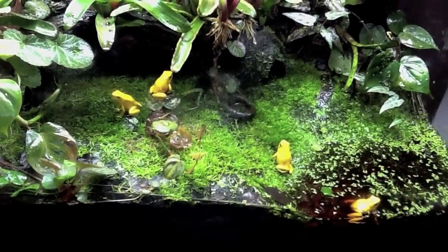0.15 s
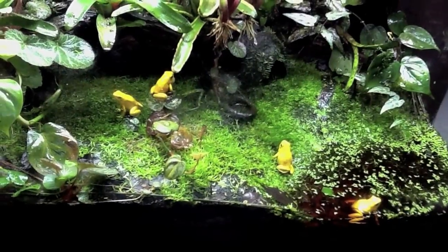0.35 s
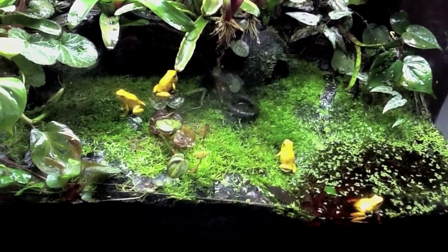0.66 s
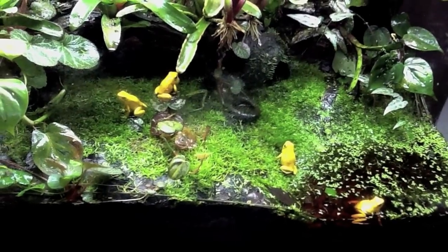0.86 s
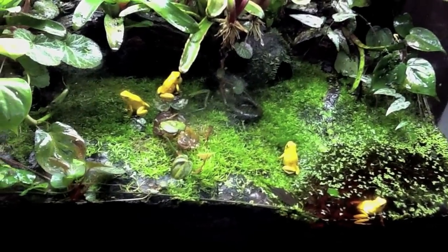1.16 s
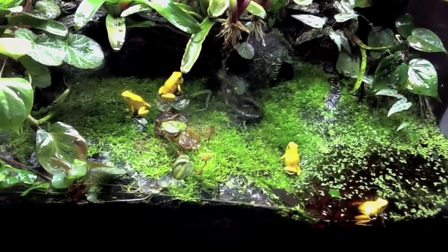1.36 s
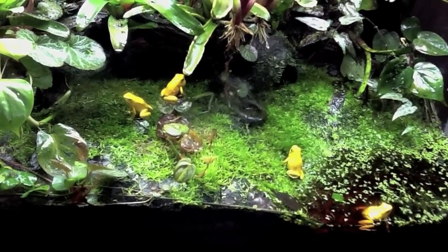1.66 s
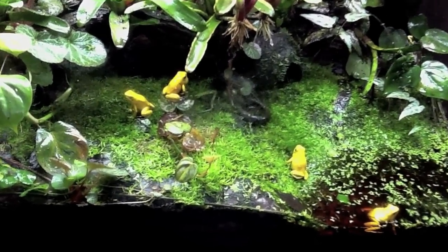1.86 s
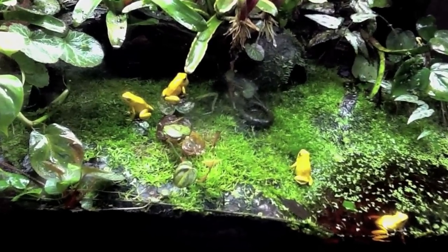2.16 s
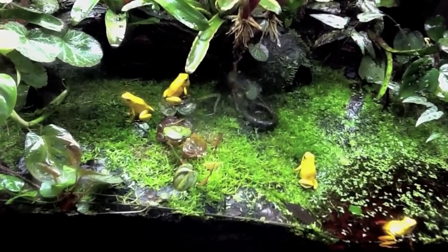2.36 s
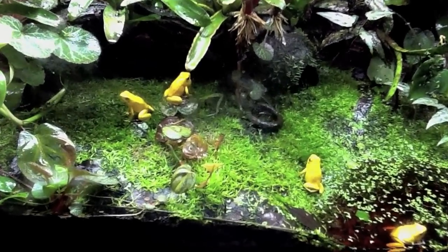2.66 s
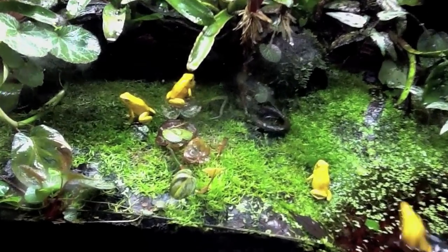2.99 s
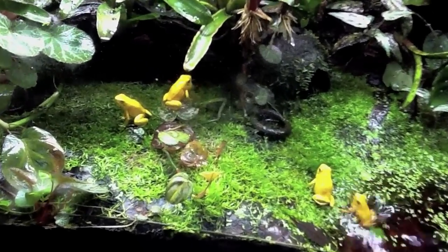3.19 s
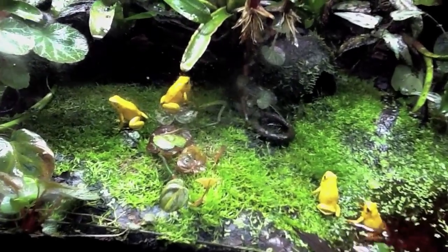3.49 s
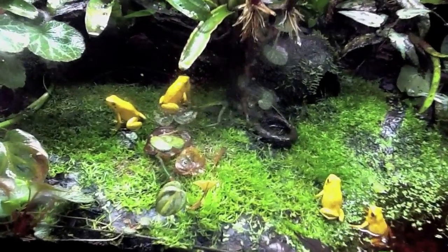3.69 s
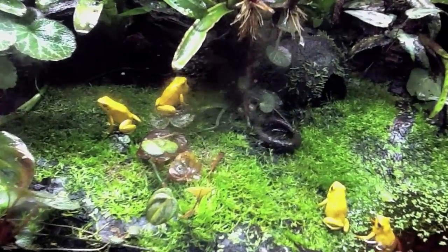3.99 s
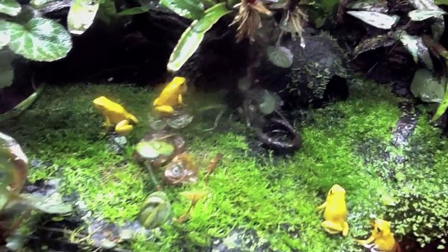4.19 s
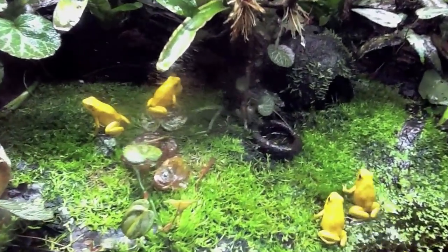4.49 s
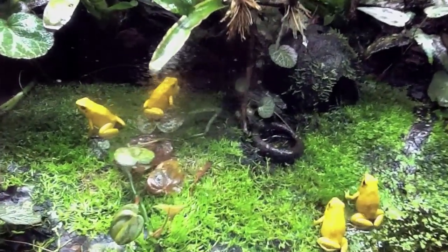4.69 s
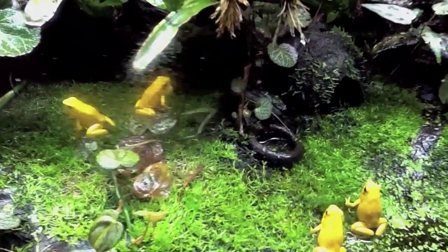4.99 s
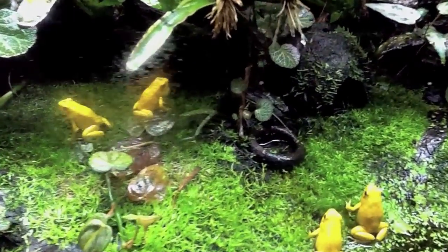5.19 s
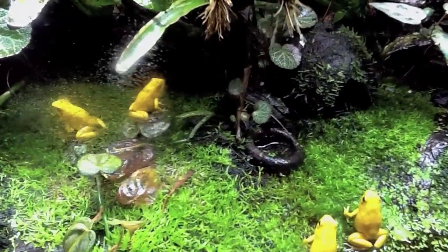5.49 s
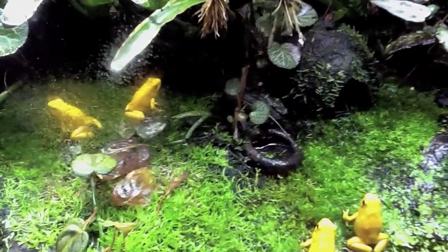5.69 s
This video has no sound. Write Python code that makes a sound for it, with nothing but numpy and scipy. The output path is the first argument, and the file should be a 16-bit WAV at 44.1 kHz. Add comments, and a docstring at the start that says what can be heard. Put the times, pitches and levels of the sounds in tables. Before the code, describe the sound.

A small frog calls in a rapid, clicky, high-pitched trill over the faint low hum of a fan.

```python
"""Poison frog in a glass terrarium

The frog trills at about ten notes a second, with three weak squeaks where notes fail. Each note opens
with a click of the larynx; then a reedy tone, the harmonics of the vocal cords filtered by the vocal
sac, arches up, sags under pressure and falls away. The planted glass tank reflects the sound and
rings briefly. A ventilation fan hums underneath, with a few faint ticks and rustles."""
import sys
import numpy as np
from scipy import signal
from scipy.fft import rfft, irfft, next_fast_len
from scipy.io import wavfile
from scipy.ndimage import map_coordinates

SR = 44100
rng = np.random.default_rng(int(sys.argv[2]) if len(sys.argv) > 2 else 0)


def transcribe(u):
    """Save the signal u as a 16-bit wav file named by the first command-line argument.

    u: samples, shape (n,) or (channels, n), limited to [-1, 1]; the rate is SR.
    q: integer samples, one column per channel.
    """
    v = np.clip(np.atleast_2d(u).T, -1, 1)
    q = np.round(v * 32767).astype(np.int16)
    wavfile.write(sys.argv[1], SR, q)


N = 257984
TIME = np.arange(N) / SR

# effort, which builds over the trill and slackens at its end: t/s, level/dB, f/Hz
CALL_EFFORT = [(.24, -35, 1421), (.62, -32.5, 1396), (1.25, -31, 1408), (1.5, -29, 1436),
               (2.1, -28.5, 1474), (2.33, -28.5, 1440), (3.05, -28.5, 1440), (3.35, -28, 1480),
               (3.85, -27, 1462), (4.33, -28, 1472), (4.64, -29.5, 1427)]
# mid-note pitch sag: t/s, depth at full effort/fraction of the pitch
SAG_DEPTH = [(.24, 0.12), (.62, 0.076), (1.4, .063), (1.62, 0.13), (2.4, 0.11), (3.15, .15), (3.38, .088),
             (4.2, .075), (4.64, .045)]
# spectral tilt above the second harmonic: t/s, slope/(dB per octave)
OVERTONE_TILT = [(.24, -8), (.62, 1), (1.22, 2.5), (1.62, 1.5), (3.05, 1.5), (3.38, -0.3), (4.13, .1),
                 (4.45, 3), (4.64, 0)]
# note duration, longest in the middle of the trill: t/s, duration/s
NOTE_LENGTH = [(.24, .035), (.62, .0415), (1.8, 0.0409), (2.4, 0.043), (3.4, .043), (3.8, .0405),
               (4.4, .041), (4.64, .0365)]


def trill(full_effort_db=-28.5, click_db=-31, click_per_effort=-.2):
    """Pulsed airflow: each squeeze of the flanks drives one click and one tone, no two quite alike."""
    track, t = np.zeros(N), np.arange(SR // 16) / SR
    starts = note_onsets()
    for s, (tone_spread, click_spread, sag_spread) in zip(starts, rng.standard_normal((len(starts), 3))):
        db, pitch_hz = values_at(CALL_EFFORT, s)
        sag, = values_at(SAG_DEPTH, s)
        tilt_db, = values_at(OVERTONE_TILT, s)
        length, = values_at(NOTE_LENGTH, s)
        effort_db = db - full_effort_db
        tone = vocal_cords(t, effort_db, pitch_hz, sag * (1 + .12 * sag_spread), length, tilt_db)
        tone_gain = amp(db + .32 * tone_spread)
        # the click gives way as the squeeze hardens
        click_gain = amp(click_db + click_per_effort * effort_db + .8 * click_spread)
        note = tone_gain * tone + click_gain * larynx_click(t)
        add(track, s, terrarium(note, tank_db=-8.5, room_db=-4.5))
    return track


# runs of evenly spaced notes: first onset t/s, last onset t/s
NOTE_RUNS = [(0.238, 0.2383), (0.6212, 0.8122), (1.0040, 1.395), (1.5838, 1.7808), (2.0727, 2.5568),
             (2.6606, 2.863), (2.9560, 3.3450), (3.4450, 4.5290), (4.6392, 4.63)]


def note_onsets(period_s=.098):
    """Near-periodic repetition: the beat is steady within a run and slips a little between runs."""
    return np.concatenate([np.linspace(first, last, 1 + round(abs(last - first) / period_s))
                           for first, last in NOTE_RUNS])


# course of one note: fraction of its length, pitch ratio at full effort, air pressure/dB
NOTE_ARCH = [(0, .876, -15.5), (.1, .93, -13), (.25, .973, -7.3), (.45, .993, -3.4), (.66, 1.025, -.9),
             (.77, .993, -6.5), (.84, .969, -9), (.92, 0.908, -4), (1, .888, -9.5)]
# radiation response of the vocal sac: f/Hz, level/dB
SAC_RESPONSE = [(1130, -5.5), (1330, -8), (1490, -1.36), (2300, -3.5), (2620, 3), (2960, 1), (3250, -15),
                (3850, -8), (4250, -6.5), (4800, -21), (5850, -21), (7100, -25), (7900, -35), (8300, -25.5),
                (8650, -19), (9300, -35), (10000, -39)]


def vocal_cords(t, effort_db, pitch_hz, sag, length, tilt_db, sag_at=.476, sag_width_s=.00389,
                jitter=.0063, flutter=.079, dulling_db=12, bloom_above_db=-4):
    """Source and filter: harmonics sweep through the sac's resonances and dull as the air runs out."""
    progress = np.clip(t / length, 0, 1)
    ratio, pressure_db = values_at(NOTE_ARCH, progress)
    bend = ratio - 1 - sag * np.exp(-((t - sag_at * length) / sag_width_s) ** 2)
    # under a feeble squeeze the cords flutter and the note turns into a croak
    croak = np.interp(effort_db, [-8, -5], [1, 0])
    unsteady = (jitter + flutter * croak) * wobble(706, len(t))
    # a harder squeeze bends the pitch further
    hz = pitch_hz * (1 + amp(1.48 * effort_db) * bend + unsteady)
    phase = 2 * np.pi * np.cumsum(hz) / SR
    harmonic = np.arange(1, 8)[:, None]
    octaves = np.log2(harmonic / 2)
    slope_db = tilt_db * np.maximum(octaves, 0) - dulling_db * (progress - .5) * octaves
    # the top harmonics bloom with effort and high pressure
    bloom_db = (1.45 * effort_db + .42 * (pressure_db - bloom_above_db)) * (harmonic > 3)
    harmonic_db = along(SAC_RESPONSE, harmonic * hz) + slope_db + bloom_db
    tone = np.sum(amp(harmonic_db) * np.sin(harmonic * phase), axis=0)
    return tone * amp(pressure_db) * gate(t, length, rise=.0018, fall=.0033)


# modes struck as the larynx opens: f/Hz, level/dB, T60/s
LARYNX_MODES = [(1370, -2.5, 0.03), (1559, -4, 0.021), (1960, -12.5, 0.026), (2287, -.2, 0.016),
                (2945, -3, 0.0063), (4140, -13.5, 0.014)]


def larynx_click(t, rattle=.047, rattle_t60=.045, rise_s=.00082, cutoff_hz=1200):
    """Impulse excitation: a snap and brief rattle ring damped modes; the small body radiates no bass."""
    force = rattle * rng.standard_normal(len(t)) * amp(-60 * t / rattle_t60)
    force[0] += 1
    ring = sum(amp(db - 60 * t / t60) * np.sin(2 * np.pi * (hz * t + rng.random()))
               for hz, db, t60 in LARYNX_MODES)
    snap = signal.fftconvolve(force, ring * np.clip(t / rise_s, 0, 1))[:len(t)]
    return butterworth(snap, 5, cutoff_hz, "high")


# failed notes: t/s, level/dB, duration/s
FAILED_NOTES = [(1.496, -33.5, .025), (1.887, -29, 0.023), (1.985, -29, .025)]
# course of one squeak: fraction of its length, f/Hz, level/dB
SQUEAK_COURSE = [(0, 1620, -15.5), (.18, 1641, -14), (.33, 1806, 3), (.55, 1930, -14), (.68, 1600, -1),
                 (.84, 1444, 0.5), (1, 1230, -23)]


def squeaks(octave_db=-13):
    """Weakly driven oscillation: short of pressure, the cords give a near-pure tone that lifts and falls."""
    track, t = np.zeros(N), np.arange(SR // 16) / SR
    for s, db, length in FAILED_NOTES:
        hz, course_db = values_at(SQUEAK_COURSE, t / length)
        phase = 2 * np.pi * np.cumsum(hz) / SR
        tone = np.sin(phase) + amp(octave_db + along(SAC_RESPONSE, 2 * hz)) * np.sin(2 * phase)
        swell = amp(db + course_db) * gate(t, length, rise=.001, fall=.002)
        add(track, s, terrarium(tone * swell, tank_db=-16, room_db=-9.5))
    return track


# early reflections off the glass: delay t/s, level/dB
PANE_ECHOES = [(.0031, -12), (.0074, -11.5), (0.0124, -17.5), (0.0183, -14.5)]
# modes of the glass tank: f/Hz, level/dB, T60/s
TANK_MODES = [(1469, -3.5, 0.032), (2607, -4, 0.096), (2840, -6.5, 0.2), (4160, -6, 0.033),
              (8640, -3, 0.04)]


def terrarium(x, tank_db, room_db, tank_t60=.046, room_t60=.3, leaves_db=7):
    """Convolution: direct sound plus pane echoes, the tank's scatter and modes, and the room beyond."""
    t = np.arange(SR // 3) / SR
    scatter, room = diffuse_tail(t, tank_t60), diffuse_tail(t, room_t60)
    # leaves scatter the short waves most; the room returns mainly the long ones
    scatter += amp(leaves_db) * butterworth(scatter, order=8, hz=4800, kind="high")
    room = butterworth(room, order=2, hz=3200, kind="low")
    response = amp(tank_db) * scatter + amp(room_db) * room
    response[0] += 1
    for delay, db in PANE_ECHOES:
        response[round(delay * SR)] += amp(db)
    for hz, db, t60 in TANK_MODES:
        decay = amp(-60 * t / t60)
        response += 2 * amp(db) * np.cos(2 * np.pi * hz * t) * decay / decay.sum()
    return signal.fftconvolve(x, response)


def diffuse_tail(t, t60, rise_s=.0053):
    """Reverberation: dense reflections merge into exponentially decaying noise, here of unit energy."""
    tail = rng.standard_normal(len(t)) * amp(-60 * t / t60) * np.clip(t / rise_s, 0, 1)
    return tail / np.linalg.norm(tail)


# small sharp ticks: t/s, level/dB
FAINT_TICKS = [(2.6865, -39), (4.0186, -39)]
# soft rustles: t/s, level/dB, Gaussian width/s
SOFT_RUSTLES = [(.497, -52.5, 0.019), (5.24, -64, .04), (5.5, -61.5, 0.032)]


def ticks_and_rustles(tick_t60=.036):
    """Amplitude-modulated noise: sudden decays are heard as ticks, smooth swells as rustles."""
    ticks = sum(amp(db - 60 * np.abs(TIME - s) / tick_t60) * (TIME >= s) for s, db in FAINT_TICKS)
    rustles = sum(amp(db) * np.exp(-.5 * ((TIME - s) / width) ** 2) for s, db, width in SOFT_RUSTLES)
    bright = noise([(500, -15), (3000, 2.5), (7000, -6), (11000, -4), (14500, .5)])
    soft = noise([(400, -21), (1900, 9), (3300, 2), (7000, -13), (15000, -29.5)])
    return ticks * bright + rustles * soft


# motor tones: f/Hz, rms level/dB
MOTOR_TONES = [(218.6, -52), (178, -59)]
# spectrum of fan and room noise: f/Hz, relative level/dB
AIR_SPECTRUM = [(30, -41.5), (65, -30), (100, -12), (140, -7.5), (215, -1), (250, -8), (310, -11),
                (380, -11.5), (500, -14), (680, -18), (1100, -23.5), (2000, -26.5), (4500, -27.5),
                (15000, -29)]
# spectra of two hollow resonances in the fan's rush: f/Hz, relative level/dB
LOW_RESONANCE = [(190, -50), (275, -10), (308, 0), (340, -10.5), (480, -45)]
HIGH_RESONANCE = [(300, -48), (410, -8.5), (465, 2.5), (510, -10), (700, -50)]
# the low resonance gives way to the high one: t/s, low level/dB, high level/dB
RESONANCE_LEVELS = [(0, -58, -64.5), (2, -63, -66.5), (4, -67, -61), (5.85, -63, -57.5)]


def fan(air_db=-47, waver_db=1.5, drift_rad=.37):
    """Tonal and broadband noise: slightly unsteady motor tones lie over resonant rushing air and hiss."""
    hum = np.zeros(N)
    for hz, db in MOTOR_TONES:
        peak = np.sqrt(2) * amp(db + waver_db * wobble(5.02, N))
        hum += peak * np.sin(2 * np.pi * hz * TIME + drift_rad * wobble(2.95, N))
    low_db, high_db = values_at(RESONANCE_LEVELS, TIME)
    hollow = amp(low_db) * noise(LOW_RESONANCE) + amp(high_db) * noise(HIGH_RESONANCE)
    return hum + hollow + amp(air_db) * noise(AIR_SPECTRUM)


def amp(db):
    """Amplitude ratio of a level in dB."""
    return 10 ** (np.asarray(db) / 20)


def values_at(table, x):
    """Linear interpolation of a table's other columns where its first equals x."""
    axis, *columns = np.transpose(table)
    return [np.interp(x, axis, column) for column in columns]


def along(spectrum, hz):
    """Interpolation of a spectrum on a logarithmic frequency axis."""
    f, db = np.transpose(spectrum)
    return np.interp(np.log(hz + 1), np.log(f + 1), db)


def filtered(x, response):
    """Filtering as multiplication by a frequency response."""
    size = next_fast_len(len(x) + 8192)
    return irfft(rfft(x, size) * response(np.fft.rfftfreq(size, 1 / SR)), size)[:len(x)]


def butterworth(x, order, hz, kind):
    """Maximally flat high-pass or low-pass filtering."""
    return signal.sosfilt(signal.butter(order, hz, kind, fs=SR, output="sos"), x)


def noise(spectrum):
    """Spectral shaping of white noise, scaled to rms 1."""
    x = filtered(rng.standard_normal(N), lambda hz: amp(along(spectrum, hz)))
    return x / np.sqrt(np.mean(x ** 2) + 1e-20)


def wobble(rate, size):
    """Smooth random fluctuation: a spline through rate knots a second."""
    knots = rng.standard_normal(int(size * rate / SR) + 4)
    return map_coordinates(knots, [np.arange(size) * rate / SR])


def gate(t, length, rise, fall):
    """Trapezoidal envelope from 0 to length."""
    return np.clip(t / rise, 0, 1) * np.clip((length - t) / fall, 0, 1)


def add(track, s, sound):
    """Superposition of a sound on the track at time s."""
    part = track[round(s * SR):][:len(sound)]
    part += sound[:len(part)]


def scene():
    """Superposition of the frog and its surroundings in one channel."""
    return (trill() + squeaks() + ticks_and_rustles() + fan())[None]


def record(dry, top_hz=15330):
    """Band limiting: an ideal low-pass filter removes the highest treble."""
    return np.array([filtered(channel, lambda hz: hz < top_hz) for channel in dry])


dry = scene()
out = record(dry)
transcribe(out)
```